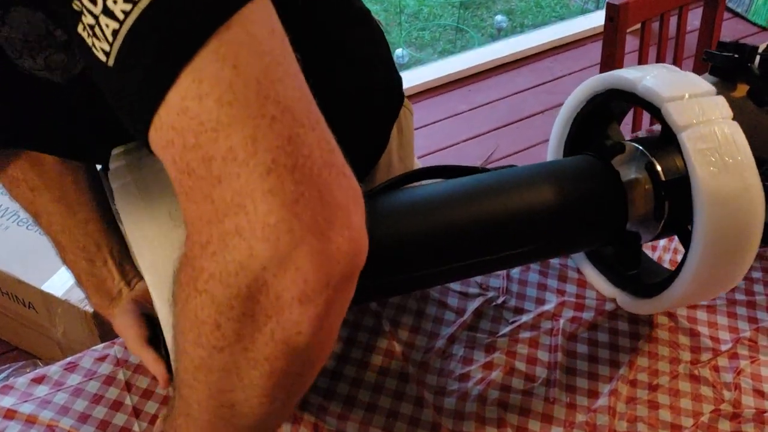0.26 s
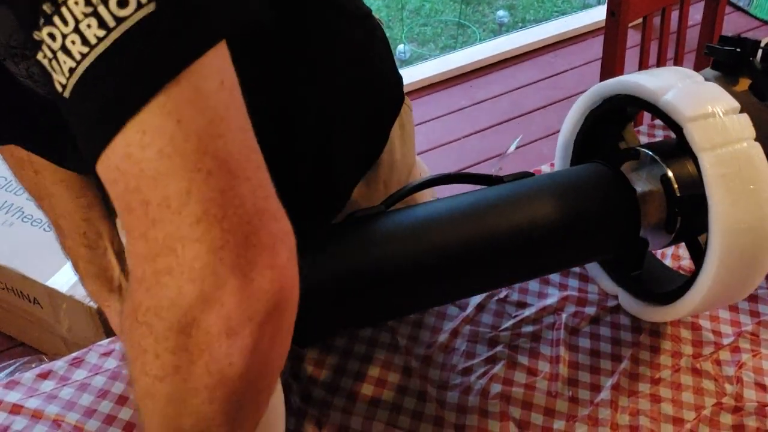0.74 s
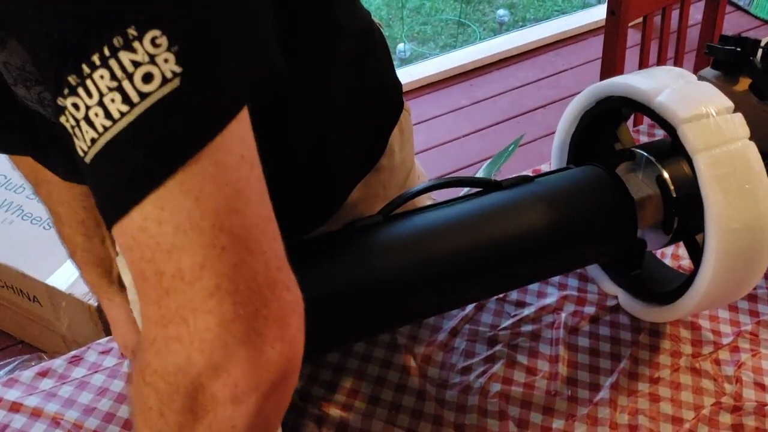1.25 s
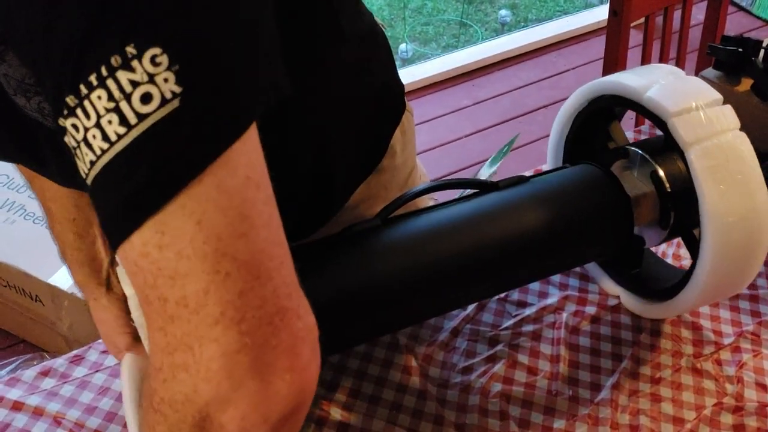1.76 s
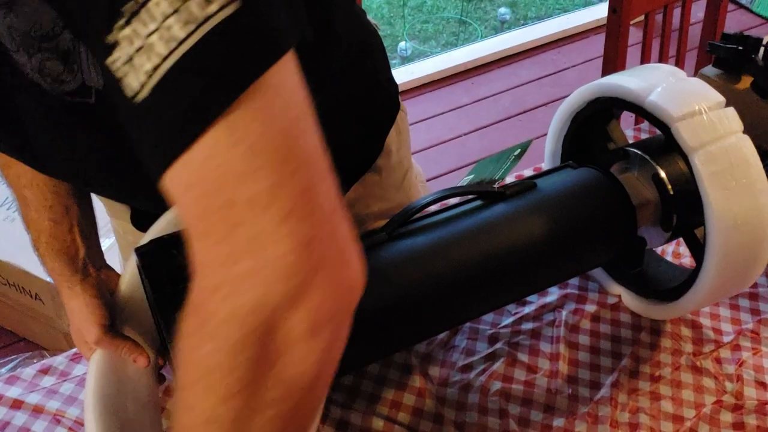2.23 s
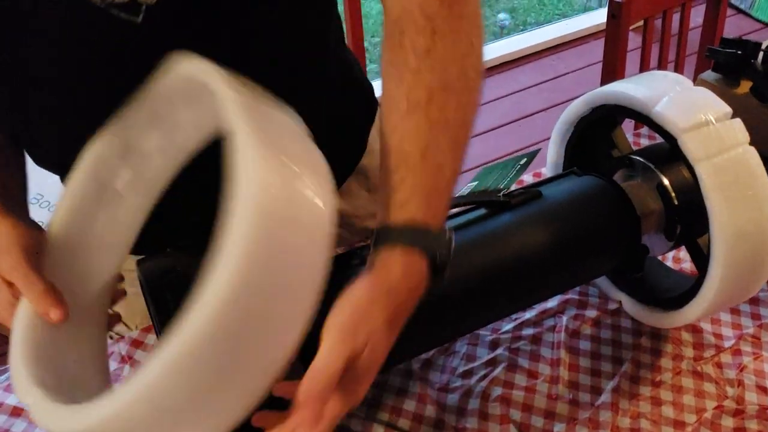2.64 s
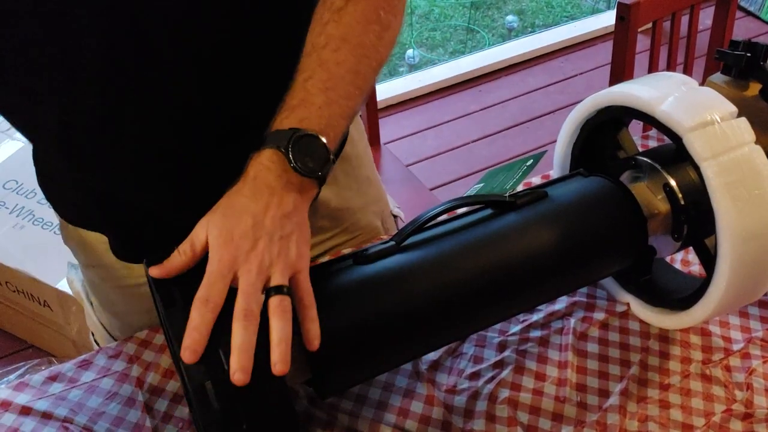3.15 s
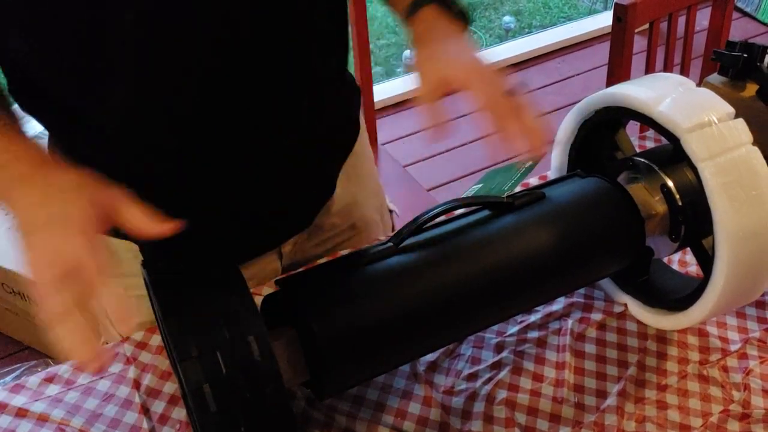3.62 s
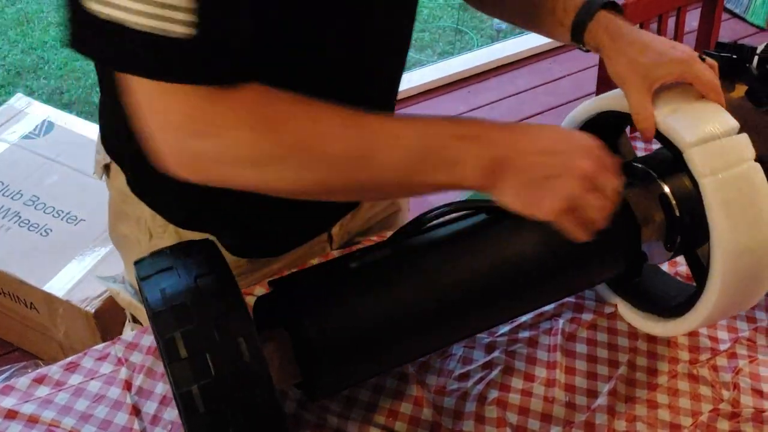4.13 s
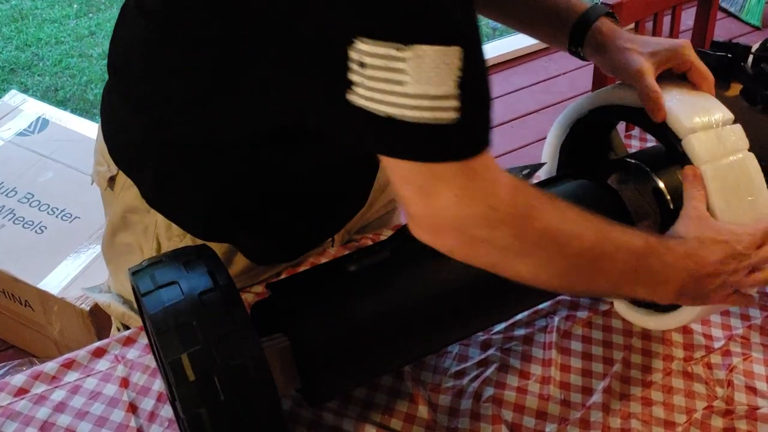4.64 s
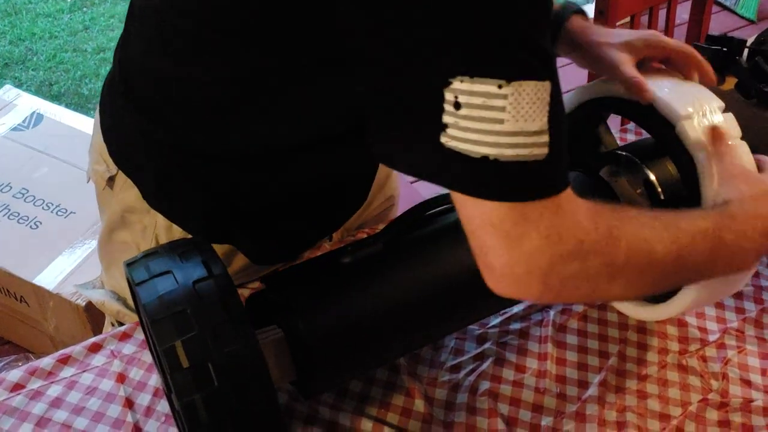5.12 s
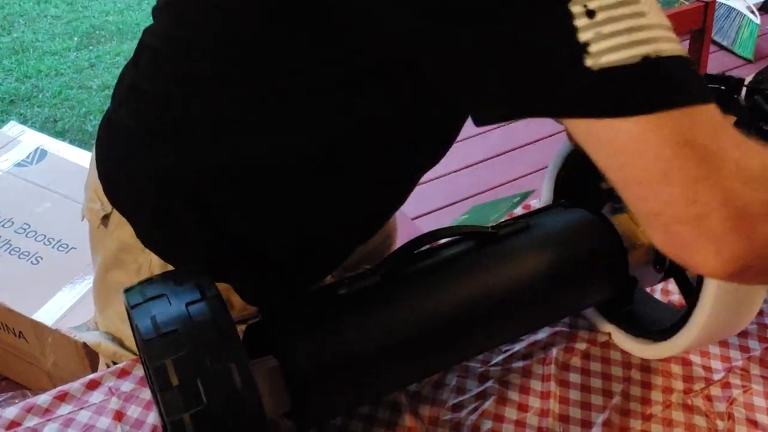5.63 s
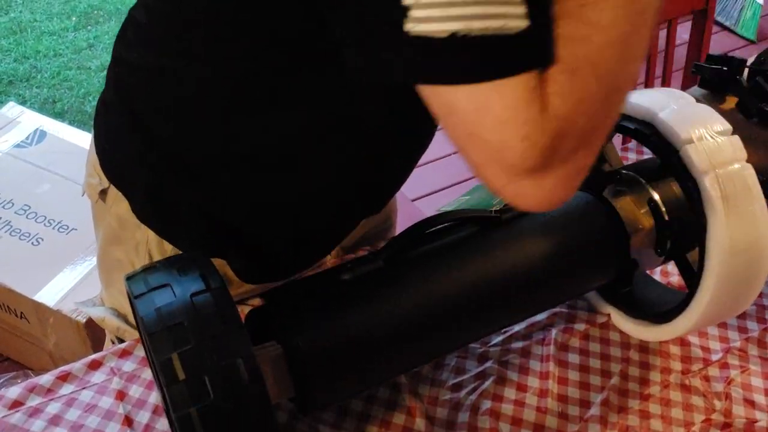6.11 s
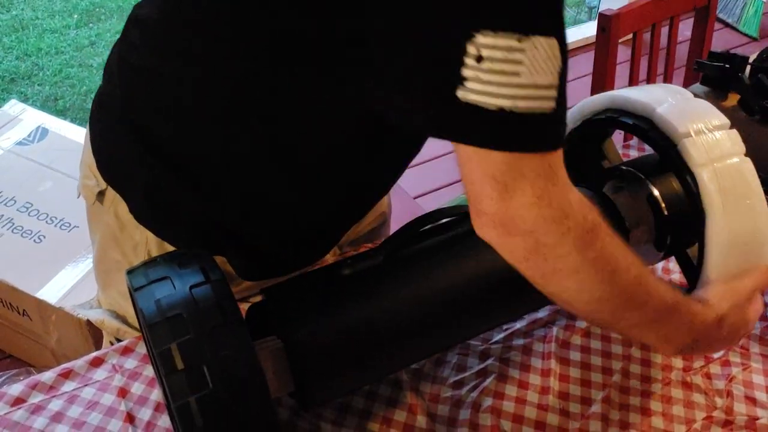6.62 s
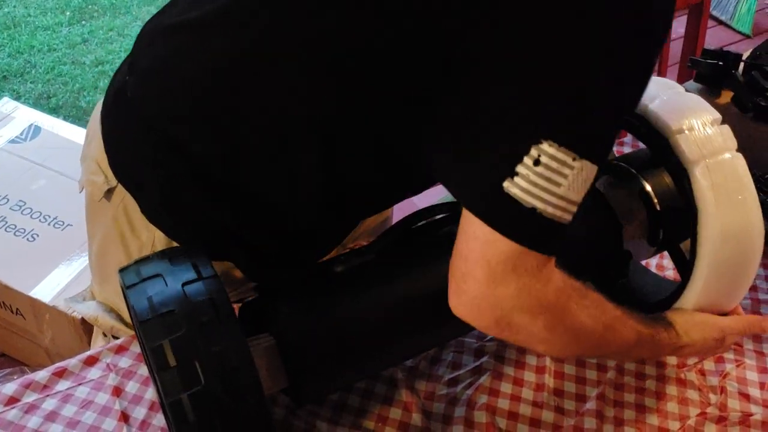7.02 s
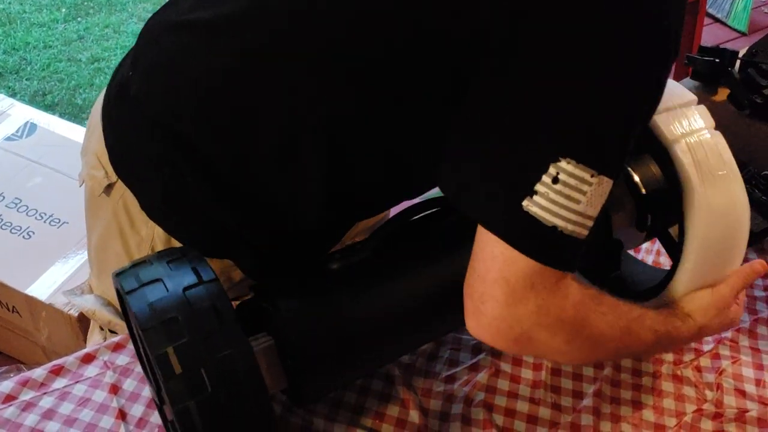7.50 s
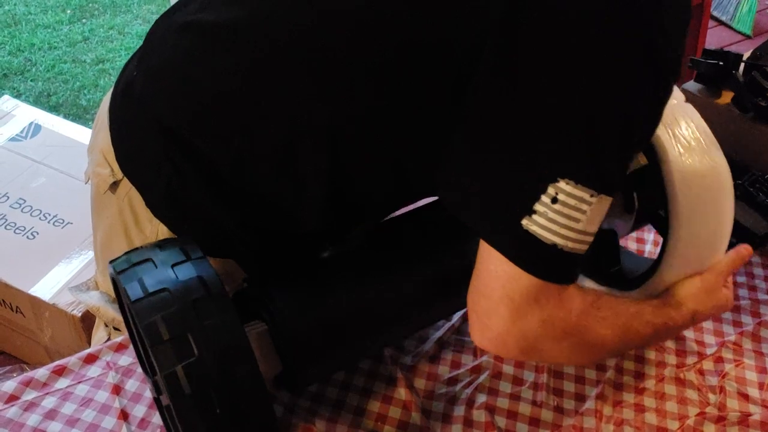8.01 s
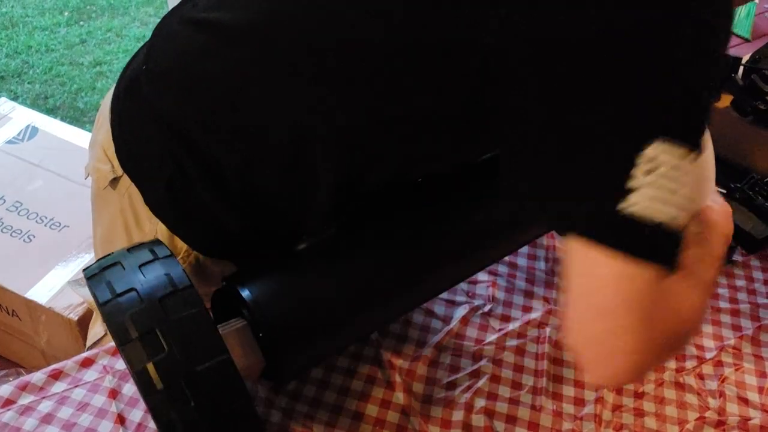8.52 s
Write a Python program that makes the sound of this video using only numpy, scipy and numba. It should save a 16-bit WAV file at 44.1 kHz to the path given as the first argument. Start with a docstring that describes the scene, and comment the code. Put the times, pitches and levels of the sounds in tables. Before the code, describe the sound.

A stereo microphone near a table in a small room catches foam sticking and slipping on a wheel: sharp crackling creaks, hollow groans, then a release with a double dull thud. Light skin-on-tyre brushing comes next. Afterwards a second sleeve, on the right and slightly farther off, is rocked with softer scuffs, ticks and occasional bumps over a faint rumble.

```python
"""Tight foam sleeves creak as they are worked off two wheels on a cloth-covered table in a small room.
The foam sticks and slips in sharp noise bursts, and hisses as filtered noise where it or a hand slides.
The first sleeve pops free at two seconds and the wheel thumps on the table, a thud with short ringing tones.
Then the second sleeve, off to the right, is rocked loose. Ticks are single jerks, squeaks gliding bands of
noise; the room adds fading echoes and a faint rumble."""
import sys
import numpy as np
from scipy import signal
from scipy.fft import rfft, irfft
from scipy.io import wavfile
from scipy.ndimage import uniform_filter1d, map_coordinates
from numba import njit

SR = 44100
rng = np.random.default_rng(int(sys.argv[2]) if len(sys.argv) > 2 else 0)


def wav_out(sig):
    """Save sig, one row per channel (or a flat mono array), as 16-bit PCM at SR to the path in sys.argv[1]."""
    wavfile.write(sys.argv[1], SR, np.round(np.clip(np.atleast_2d(sig).T, -1, 1) * 32767).astype(np.int16))


N = 386316
TIME = np.arange(N) / SR  # seconds

# the quiet room's rumble: pitch_hz, level_db
AIR_COLOUR = [(20, -10.5), (85, 0), (160, -12.5), (300, -23), (400, -13.5), (520, -26.5), (1200, -29.5),
              (16000, -25)]
# foam or a hand slides: start_s, length_s, level_db, swell_db (start to end),
# brightness_db (high for a light touch)
STROKES = [(0.022, 0.28, -54, -15.5, 4.5), (0.221, 0.09, -38, 1.5, -1.5), (0.392, 0.12, -35.5, -1.5, 2.5),
           (0.625, 0.2, -29.5, 3.5, 0.5), (0.937, 0.16, -32, -5, -2.5), (1.264, 0.06, -38, 1.5, -2),
           (1.573, 0.047, -32.5, -0.5, -2.5), (1.709, 0.041, -35, -1.5, -7), (1.948, 0.029, -23, -0.5, 2),
           (2.172, 0.23, -54, 7, 6.5), (2.492, 0.27, -42, -12, 7), (2.935, 0.057, -57.5, 4, 4.5),
           (3.073, 0.077, -58.5, -4, 13), (3.34, 0.043, -55, -7, 19.5), (3.422, 0.043, -46.5, 1, 18),
           (3.458, 0.14, -47.5, -12.5, 9), (3.701, 0.016, -51, -11, 28), (3.993, 0.16, -52, -7.5, 5.5),
           (4.309, 0.1, -41.5, -3, 3.5), (4.478, 0.078, -39.5, 1.5, 3.5), (4.622, 0.15, -43.5, 0, 2.5),
           (4.76, 0.15, -35, 2, 4), (5.148, 0.12, -45, -2, 1), (5.345, 0.068, -48.5, -0.5, 5.5),
           (5.461, 0.057, -42, -13, -1), (5.556, 0.086, -41.5, 13, -0.5), (5.695, 0.082, -45.5, 0.5, 3),
           (6.045, 0.17, -52.5, 11, 3), (6.272, 0.25, -61.5, -2.5, -4), (6.629, 0.15, -43, 0, 9.5),
           (6.775, 0.1, -41.5, -3.5, 1), (6.915, 0.24, -41, 2.5, -0.5), (7.514, 0.18, -43.5, 3.5, 1.5),
           (7.751, 0.41, -52, -16, 1), (8.281, 0.11, -53, 10.5, 3), (8.495, 0.34, -45.5, 3.5, 5.5)]
# colour of smooth sliding: pitch_hz, level_db
SLIDE_COLOUR = [(60, -29), (170, -10.5), (380, -0.5), (1000, -1), (2200, 1), (5500, -4.5), (7600, -3.5),
                (8500, -14.5), (12400, -10.5), (16000, -14)]
# bass in the sliding, highest on the bare tyre: time_s, level_db
SLIDE_BASS = [(0.3, 1), (1.3, 2.5), (1.8, 2.5), (2.55, 3.5), (3.1, 12.5), (3.7, 17), (4.05, -4), (4.85, -6),
              (5.22, 0), (7.1, -0.5), (8.7, -7)]
# the stretched foam wall rings as the grip shifts: time_s, pitch_hz, strength (plain factor)
WALL_RINGING = [(1.2, 2870, 0.16), (1.55, 1150, 0.8), (1.95, 1135, 0.46), (2.501, 3994, 0.84),
                (3.1, 4490, 0.17), (4.5, 1858, 0.44), (5.2, 1111, 0.16), (5.62, 846.6, 0.47),
                (5.9, 840, 0.2), (6.86, 910, 1.4), (6.95, 2003, 0.25), (7.3, 2300, 0.48)]
# the foam lets go with a creak: time_s, length_ms, level_db, hollowness_db
SLIPS = [(0.366, 2.2, -21.5, 0.5), (0.3953, 1.6, -12.5, -6.5), (0.47, 1.15, -18.5, -12.5),
         (0.567, 1.35, -14, -4), (0.575, 5.2, -18.5, 3), (0.597, 2, -14.5, -3.5), (0.628, 2.5, -13, -4),
         (0.6417, 4.2, -18.5, -2.5), (0.657, 4.9, -15, -3.5), (0.674, 2.4, -16, 2.5),
         (0.7103, 1.5, -19, -5.5), (0.724, 2.1, -10.5, -2), (0.7644, 1.3, -7.5, 1.5),
         (0.8149, 2.3, -9.5, 0), (0.925, 2, -13, 1), (0.948, 2.6, -9.5, 0), (0.999, 3.9, -13, 2),
         (1.0289, 3.4, -12.5, 0.5), (1.0562, 2.2, -13, 12), (1.098, 4.9, -19, 3), (1.176, 5.6, -18.5, 6.5),
         (1.605, 4.2, -16, 2), (1.666, 1.34, -19.5, 15.5), (1.732, 13.8, -15.5, 8), (1.76, 1.7, -19, 11),
         (1.784, 3.2, -21.5, 10.5), (1.869, 1.6, -20.5, 5.5), (1.919, 25, -18.5, 7.5),
         (2.057, 11.6, -25, -2.5), (4.355, 2.65, -20.5, -2), (4.483, 7, -27, 0), (4.757, 3, -21.5, 2.5),
         (4.874, 21, -27.5, 2), (4.939, 7.9, -20, -1), (5.594, 1.8, -33.5, 19), (5.745, 9.2, -29, 5),
         (6.046, 3.5, -36.5, 3), (6.869, 18, -41, 7), (7.256, 8.1, -29, 9.5), (7.629, 23, -28.5, 6),
         (8.372, 6.6, -25.5, -3.5)]
# colour of a slip: pitch_hz, level_db
CREAK_COLOUR = [(50, -35), (110, -21.5), (180, -2.5), (270, -7), (380, -1.5), (580, -7), (1150, -4.5),
                (1750, -4.5), (3000, -1.5), (4700, -4.5), (7300, -5), (8700, -14.5), (12400, -13),
                (16000, -18.5)]
# the first sleeve, still tight on its wheel, rings as a hoop: time_s, pitch_hz, strength (plain factor)
HOOP_RINGING = [(0.6, 460, 0.94), (1.03, 370, 1.2), (1.25, 390, 0.03)]
# the wheels bump the table: time_s, level_db, centre_hz
THUMPS = [(1.986, -16.5, 108), (2.014, -16, 286), (2.04, -23, 200), (2.067, -18.5, 257),
          (2.606, -37.5, 237), (2.674, -45, 420), (3.471, -26.5, 560), (3.498, -35.5, 186),
          (3.69, -41.5, 577), (4.943, -24.5, 264), (7.629, -36.5, 186), (8.372, -28, 510)]
# ringing of table and axle: pitch_hz, level_db, fade_s (time to fall by 60 dB)
TABLE_MODES = [(110.4, -4.5, 0.45), (169.3, -8, 0.52), (204.3, 4, 0.2), (250.4, 2, 0.15), (396, -13, 0.21),
               (515.6, 11, 0.12), (706, 6, 0.15)]
# fingertips tick on foam, tyre and rim: time_s, level_db (peak of the jerk before colouring)
TICKS = [(2.349, -34), (3.092, -33.5), (3.142, -33), (3.351, -38), (3.426, -36), (3.472, -21),
         (4.218, -24.5), (4.227, -30), (4.461, -18), (4.62, -21), (4.64, -23), (4.645, -16.5), (5.037, -21),
         (6.54, -29.5), (7.775, -21.5)]
# colour of a tick: pitch_hz, level_db
TICK_COLOUR = [(200, -12), (1200, 1), (4500, 12), (12000, 1), (16000, 0)]
# the foam gives a short rising squeak: time_s, starting_pitch_hz, level_db
SQUEAKS = [(2.61, 1910, -45), (7.815, 1680, -48.5)]

AIR_DB = -67  # middle level of each layer of room noise
ROOM_FADE_LOW_S, ROOM_FADE_HIGH_S = 0.95, 0.6  # time for bass and treble echoes to fall by 60 dB
CHANGE_WHEEL_S = 3.9  # the move to the second wheel starts here and takes 0.1 s
TOP_HZ = 15900
# between strokes the hands never quite rest
FIDGET_DB, FIDGET_SWING_DB, FIDGET_BRIGHT_DB = -67, 8, 12
# a longer stroke sets in more gently: the share of its length is added to the attack
STROKE_ATTACK_S, STROKE_ATTACK_SHARE, STROKE_RELEASE_DB_PER_S = 0.006, 0.065, 219.5
JUDDER_FROM_DB = -46  # softer or lighter strokes slide smoothly
# a firm stroke judders in small uneven slips; their level is counted from that of the stroke
JUDDER_PER_S, JUDDER_MS, JUDDER_DB, JUDDER_SCATTER_DB = 55, 1.73, 5.5, 3  # the middle gap is 1/55 s
TICK_MS = 0.57  # fading time of the scatter after a tick
SQUEAK_S, SQUEAK_RISE_HZ_PER_S = 0.047, 8400


def undb(db):
    """Turn decibels into a plain gain."""
    return 10 ** (np.asarray(db) / 20)


def unit(x):
    """Scale to an rms (average strength) of 1."""
    return x / np.sqrt(np.mean(x ** 2))


def on_log_axis(points, hz):
    """Read (Hz, dB) points at the given frequencies, evenly by musical interval."""
    f, db = np.transpose(points)
    return np.interp(np.log(np.maximum(hz, 1)), np.log(f), db)


def colour(x, points):
    """Filter a steady sound by the (Hz, dB) points."""
    gain = undb(on_log_axis(points, np.fft.rfftfreq(N, 1 / SR)))
    return irfft(rfft(x) * gain, N)


def response(db, size=2048):
    """Make a filter click with the given gain per frequency and nothing before its start."""
    cepstrum = irfft(np.log(undb(db)))
    # folding the second half onto the first moves the energy to the start
    cepstrum[1:size // 2] *= 2
    cepstrum[size // 2 + 1:] = 0
    return irfft(np.exp(rfft(cepstrum)))


def filtered(x, hz, kind, order=2):
    """Keep only part of the spectrum, with a smooth (Butterworth) filter."""
    return signal.sosfilt(signal.butter(order, hz, kind, fs=SR, output="sos"), x)


def add(track, s, x):
    """Mix a short sound into a track at time s."""
    i = max(int(s * SR), 0)
    track[i:i + len(x)] += x[:N - i]


def walk(rate):
    """Wander by chance with a spread of 1, drawing `rate` new values a second."""
    return unit(np.interp(TIME * rate, np.arange(N // 20), rng.standard_normal(N // 20)))


@njit
def resonate(x, hz, width):
    """Let a band with a moving centre ring; the width is a share of the centre."""
    y, band, low = np.empty(len(x)), 0., 0.
    for i in range(len(x)):
        g = np.tan(np.pi * hz[i] / SR)
        v = (band + g * (x[i] - low)) / (1 + g * (g + width[i]))
        band = 2 * v - band
        low = low + 2 * g * v
        y[i] = width[i] * v
    return y


def second_wheel(s):
    """Give 0 while the hands work at the first wheel, 1 at the second."""
    return np.clip((s - CHANGE_WHEEL_S) * 10, 0, 1)


def air():
    """A faint low rumble of the room: one noise shared by both sides and one for each."""
    mid, left, right = (unit(colour(x, AIR_COLOUR)) for x in rng.standard_normal((3, N)))
    level = undb(AIR_DB + 2 * walk(4.4))
    return level * (mid + 0.99 * np.array([left, right]))


def strokes():
    """Level and brightness of the sliding in dB: each stroke sets in, swells or sags, and dies away."""
    power = undb(FIDGET_DB + FIDGET_SWING_DB * walk(7)) ** 2
    bright, t = power * FIDGET_BRIGHT_DB, TIME[:SR]
    for s, length, db, swell_db, bright_db in STROKES:
        held_db = db + swell_db * (np.clip(t / length, 0, 1) - .5)
        release_db = STROKE_RELEASE_DB_PER_S * (t - length).clip(0)
        attack = np.clip(t / (STROKE_ATTACK_S + STROKE_ATTACK_SHARE * length), 0, 1)
        gain = attack * undb(held_db - release_db)
        add(power, s, gain ** 2)
        add(bright, s, gain ** 2 * bright_db)
    # where strokes overlap, the stronger one decides most of the brightness
    return 10 * np.log10(power), bright / power


def sliding(rub_db, treble_db, smooth=0.4, sizzle_db=-16, flutter_db=1.5, gain_db=-0.5):
    """Foam cells brush past as a hiss; tiny catches roughen it, most where the grip is firm and dull."""
    bass_db = np.interp(TIME, *np.transpose(SLIDE_BASS))
    catch_rate, catch_db, catch_s = 190, 4.2, .0006  # catches a second, spread of level, fading time
    catches = (rng.random(N) < catch_rate / SR) * undb(catch_db * rng.exponential(size=N).clip(0, 3))
    catches = unit(signal.lfilter([1], [1, -np.exp(-1 / (catch_s * SR))], catches))
    share = np.clip(smooth + 0.01 * treble_db, .1, .9)
    roughness = np.sqrt(share + (1 - share) * catches ** 2)
    # row 0 faces the listener, row 1 the room
    hiss = unit(colour(rng.standard_normal((2, N)) * roughness, SLIDE_COLOUR))
    bass = colour(hiss, [(400, -2.5), (650, -1.0), (1400, -42.0)])
    treble = colour(hiss, [(1200, -50), (2800, -4.5), (4500, 3.0), (11000, 3.5)])
    # strong only at the lightest touch, skin brushing the tyre
    sizzle = colour(hiss, [(7000, -50), (10000, 0)])
    parts = [(bass, undb(bass_db)), (hiss - bass - treble, 1), (treble, undb(treble_db)),
             (sizzle, undb(2 * treble_db + sizzle_db))]
    # divide by the expected strength, so that brightness hardly alters the level
    strength = np.sqrt(sum(np.var(x) * g ** 2 for x, g in parts))
    sound = sum(x * g for x, g in parts) / strength
    return sound * undb(rub_db + flutter_db * walk(45) + gain_db)


def foam_wall(x, width=0.49, wobble=0.024):
    """The sleeve's resonance wanders with the tension; the stronger it rings, the narrower it is."""
    s, hz, strength = np.transpose(WALL_RINGING)
    hz = np.interp(TIME, s, hz) * np.exp(wobble * walk(32))
    strength = np.interp(TIME, s, strength)
    ringing = np.array([resonate(row, hz, width / (1 + strength)) for row in x])
    return (x + strength * ringing) / np.sqrt(1 + 0.27 * strength ** 2)


def placed(x, pan_db, lag_ms):
    """Place a sound sideways: the left side hears it lag_ms later, and louder by pan_db, than the right."""
    left = map_coordinates(x, [np.arange(N) - lag_ms * SR / 1000], order=3)
    return np.array([left * undb(pan_db / 2), x * undb(-pan_db / 2)])


def room(x, early_db, late_db, early_s=0.015, size=2048):
    """Table top and arms reflect within milliseconds, the walls follow; paths change as the body moves."""
    t = TIME[:SR // 4]
    mid, side = rng.standard_normal((2, N))
    # both ears alike only in the bass
    paths = mid + filtered(side, 600, "highpass", order=1) * np.array([[1], [-1]])
    low = filtered(paths, 610, "lowpass", order=1)
    early = undb(early_db) * unit(np.exp(-t / early_s) * (t > .0015))

    def fade(fade_s):
        """Early reflections together with wall echoes that take fade_s to fall by 60 dB."""
        late = np.exp(-np.log(1000) * t / fade_s) * np.clip(t / 0.011 - .5, 0, 1)
        return np.hypot(early, undb(late_db) * unit(late)) / np.sqrt(2 * len(t))

    fade_low, fade_high = fade(ROOM_FADE_LOW_S), fade(ROOM_FADE_HIGH_S)
    out, window = np.zeros((2, N)), signal.get_window("hann", 2 * size)
    # each overlapping stretch of sound gets a fresh set of paths
    for i in range(0, N - 2 * size, size):
        k = rng.integers(N - len(t))
        echo = low[:, k:k + len(t)] * (fade_low - fade_high) + paths[:, k:k + len(t)] * fade_high
        piece = x[i:i + 2 * size] * np.sqrt(window)
        wet = signal.fftconvolve(piece[None], echo, axes=1)[:, :N - i]
        out[:, i:i + wet.shape[1]] += wet
    return out


def slip(length_ms, body, lead_share=0.042, lead_ms=3, snap=0.33, grain_db=2.0, size=4096):
    """An avalanche of foam cells letting go, at unit level; it breaks an eighth of the way in."""
    start, rise_ms = size // 8, .55
    ms = (np.arange(size) - start) / SR * 1000
    before = ms.clip(None, 0)
    build = (np.exp(before / rise_ms) + lead_share * np.exp(before / lead_ms)) / (1 + lead_share)
    # cells give way in clumps about a millisecond apart
    clumps = undb(grain_db * unit(uniform_filter1d(rng.standard_normal(size), size=32)))
    burst = rng.standard_normal(size) * clumps * build * np.exp(-(ms.clip(0) / length_ms) ** 2)
    burst /= np.linalg.norm(burst)
    burst[start] -= snap / np.sqrt(length_ms)  # the jerk of the wall counts most in a short slip
    sound = signal.fftconvolve(burst, body)
    return sound / np.linalg.norm(sound) * np.sqrt(length_ms * SR / 1000)


def creaks(rub_db, bright_db, treble_share=0.6, second_bright_db=2.0, light_touch=0.94, gain_db=-1.5,
           size=4096):
    """Foam sticks, then lets go: big slips and the judder of firm strokes, one row per face."""
    out, hz = np.zeros((2, N)), np.fft.rfftfreq(size // 2, 1 / SR)
    foam = on_log_axis(CREAK_COLOUR, hz)
    events = []
    for s, length_ms, db, hollow_db in SLIPS:
        # a hollow slip rings in the middle and loses both bass and treble; the second sleeve is brighter
        treble_db = second_bright_db * second_wheel(s) - treble_share * hollow_db
        tilt = on_log_axis([(420, -hollow_db), (900, 0.0024), (2000, 0),
                            (4500, 1.1 * treble_db), (13000, 1.5 * treble_db)], hz)
        events.append((s, length_ms, db, response(foam + tilt)))
    wait, scatter = rng.standard_normal((N // 300, 2)).T
    times = np.cumsum(np.exp(.5 * wait)) / JUDDER_PER_S
    plain = response(foam)
    for s, chance in zip(times, scatter.clip(-2, 2)):
        i = int(s * SR)
        if i < N and rub_db[i] - bright_db[i] > JUDDER_FROM_DB:
            db = rub_db[i] + JUDDER_DB - light_touch * bright_db[i] + JUDDER_SCATTER_DB * chance
            events.append((s, JUDDER_MS, db, plain))
    for s, length_ms, db, body in events:
        for face in out:
            # start early, so that the break falls on time
            add(face, s - size / 8 / SR, slip(length_ms, body) * undb(db + gain_db))
    return out


def hoop(x, width=0.11):
    """The ring of foam hums along with slips and sliding, mostly lower as it works loose."""
    s, hz, strength = np.transpose(HOOP_RINGING)
    hz, widths = np.interp(TIME, s, hz), np.full(N, width)
    hum = np.array([resonate(row, hz, widths) for row in x])
    return x + np.interp(TIME, s, strength) * hum


def thumps(thud_db=0, thud_s=0.024, ring_db=-3, spread=1.82, sway_db=-11, sway_hz=85, gain_db=-2):
    """The cloth softens each blow to a dull thud; table and axle ring briefly and the table shudders."""
    out, t = np.zeros(N), TIME[:SR // 2]
    for s, db, hz in THUMPS:
        chance = rng.standard_normal((len(TABLE_MODES), 2))
        ring = np.zeros(len(t))
        for k, ((f, d, fade_s), (a, b)) in enumerate(zip(TABLE_MODES, chance)):
            # level and pitch vary a little from blow to blow; every other tone is flipped
            tone = np.sin(2 * np.pi * f * (1 + 0.02 * b) * t)
            ring += undb(d + 2 * a) * tone * np.exp(-np.log(1000) * t / fade_s) * (-1) ** k
        thud = rng.standard_normal(len(t)) * np.exp(-t / thud_s)
        # slow, heavy blows shake the table most
        sway = unit(filtered(thud, sway_hz, "lowpass")) * (170 / hz) ** 1.5
        band = [hz / spread, hz * spread ** 0.56]
        ring, thud = (unit(filtered(x, band, "bandpass")) for x in (ring, thud))
        blow = undb(ring_db) * ring + undb(thud_db) * thud + undb(sway_db) * sway
        add(out, s, blow / np.abs(blow).max() * undb(db + gain_db))
    return out


def ticks(tail_db=-13, size=512):
    """A nail or a single cell snaps: one sharp jerk and a millisecond of scatter."""
    out, ms = np.zeros(N), TIME[:size] * 1000
    body = response(on_log_axis(TICK_COLOUR, np.fft.rfftfreq(size, 1 / SR)), size=size)
    for s, db in TICKS:
        jerk = undb(tail_db) * rng.standard_normal(size) * np.exp(-ms / TICK_MS)
        jerk[0] = 1
        add(out, s, np.convolve(jerk, body) * undb(db))
    return out


def squeaks(width=0.18):
    """Foam dragged over the rim sings in a narrow, rough band that glides up."""
    out, t = np.zeros(N), TIME[:SR // 4]
    for s, hz, db in SQUEAKS:
        pitch, widths = hz + SQUEAK_RISE_HZ_PER_S * t, np.full(len(t), width)
        once = resonate(rng.standard_normal(len(t)), pitch, widths)
        tone = unit(resonate(once, pitch, widths))
        add(out, s, tone * np.sin(np.pi * np.clip(t / SQUEAK_S, 0, 1)) * undb(db))
    return out


def scene():
    """Foam and table heard directly and through the room, first at one wheel, then at the other."""
    rub_db, bright_db = strokes()
    bumps, floor, second = thumps(), air(), second_wheel(TIME)
    foam = sliding(rub_db, bright_db) + squeaks() + creaks(rub_db, bright_db)
    towards, away = hoop(foam_wall(foam))  # towards the listener, away into the room
    clicks = ticks()
    towards, away = towards + clicks, away + 0.76 * clicks
    # the place of contact wanders round the rim
    lag_ms = np.interp(second, [0, 1], [-.03, .16]) + 0.055 * walk(20)
    direct = placed(towards, np.interp(second, [0, 1], [-1, -6]), lag_ms)
    # the second wheel is further off, so more of it comes by the walls, most of all on the right
    walls = room(away * undb(1.75 * second), early_db=0.5, late_db=-10)
    walls = walls * undb(np.array([[-1], [1]]) * second)
    bump_echoes = room(bumps, early_db=-4, late_db=-13, size=4096)
    return direct + walls + bumps + bump_echoes + floor


def record(dry):
    """The microphone's top is cut steeply."""
    return signal.sosfilt(signal.ellip(10, .2, 70, TOP_HZ, fs=SR, output="sos"), dry)


dry = scene()
out = record(dry)
wav_out(out)
```